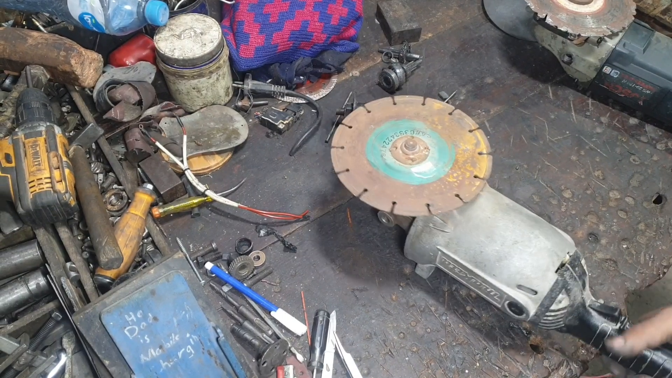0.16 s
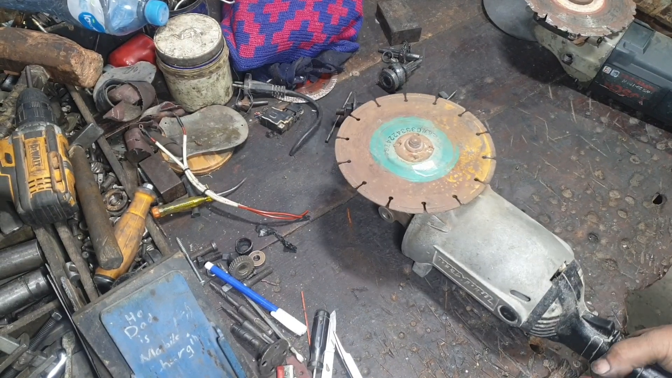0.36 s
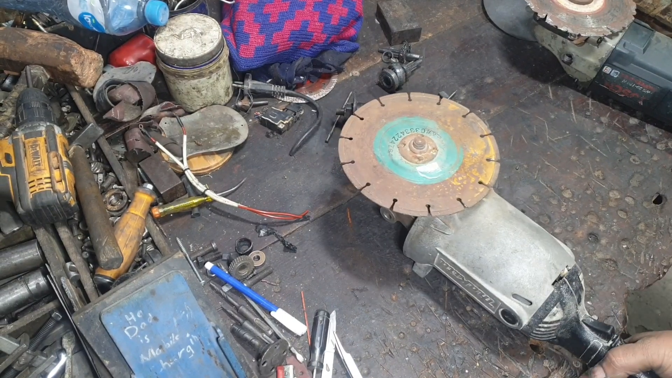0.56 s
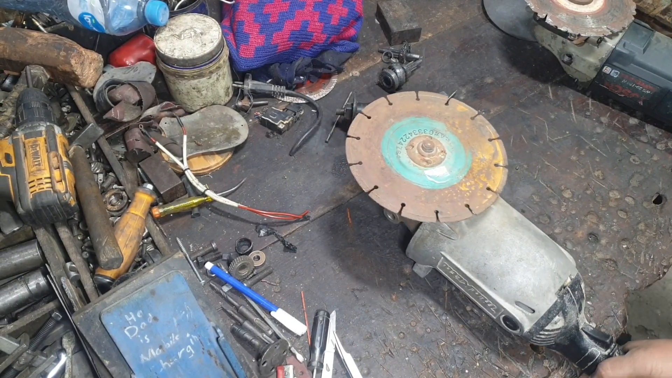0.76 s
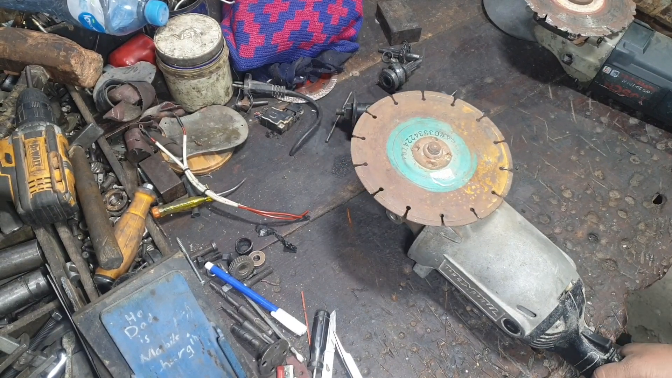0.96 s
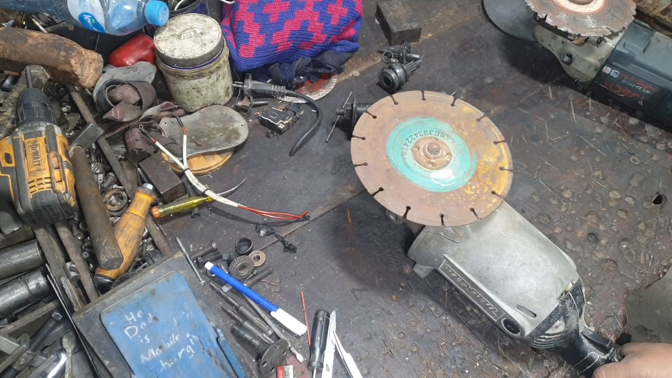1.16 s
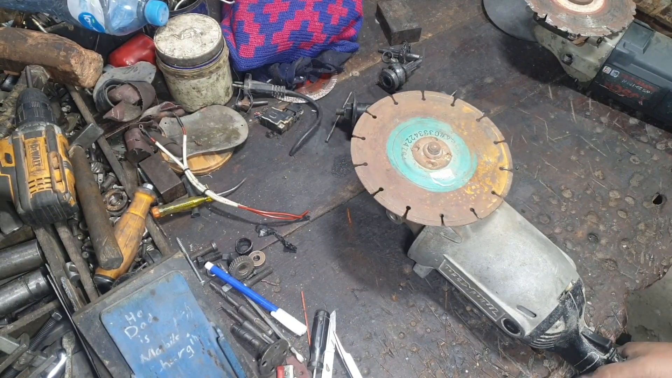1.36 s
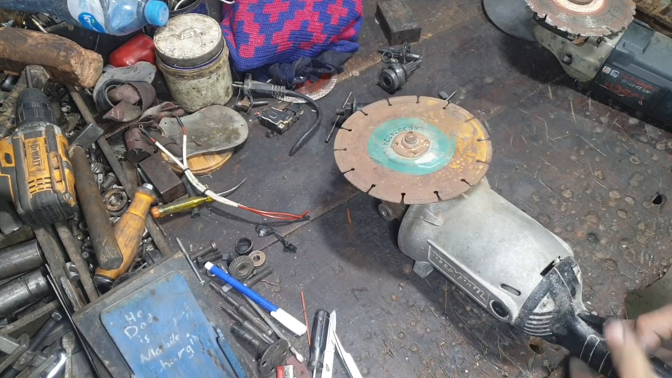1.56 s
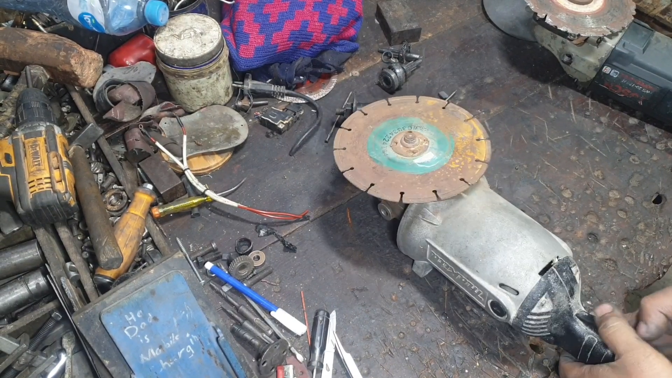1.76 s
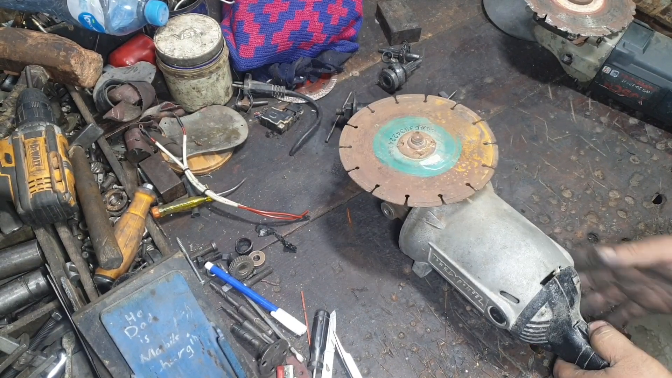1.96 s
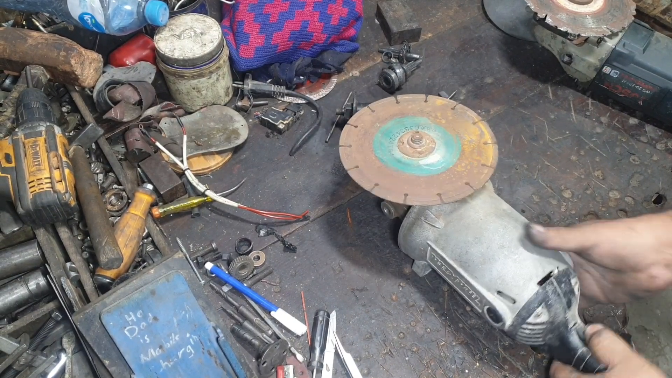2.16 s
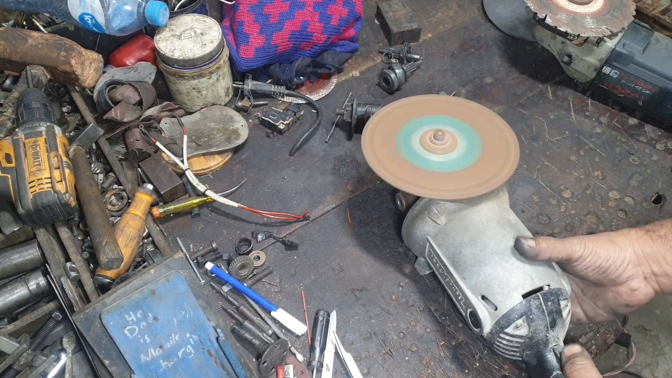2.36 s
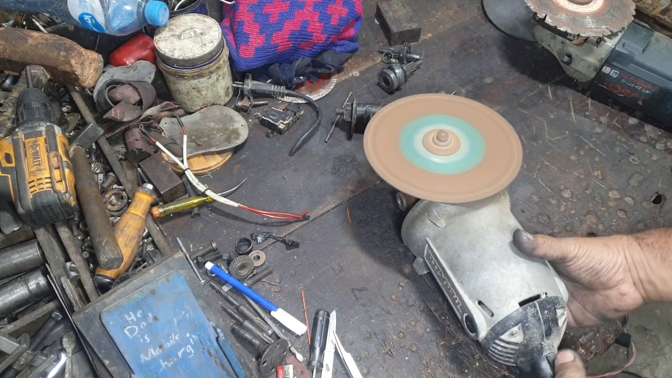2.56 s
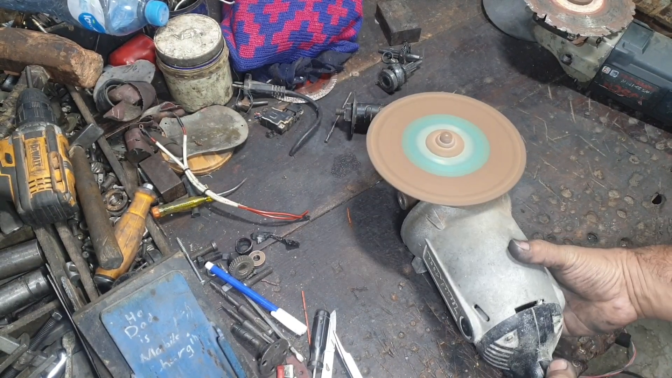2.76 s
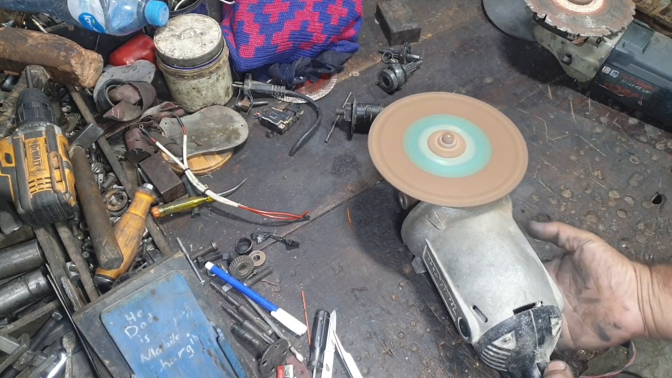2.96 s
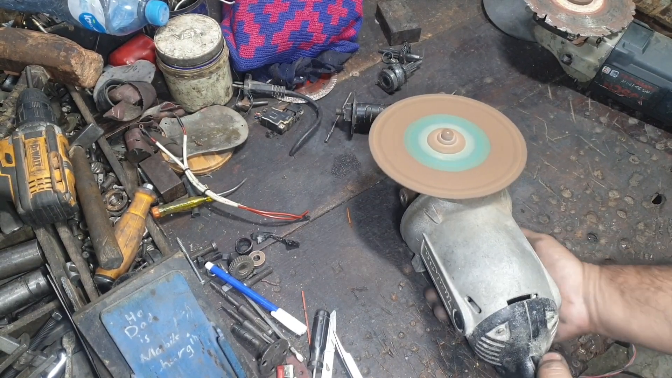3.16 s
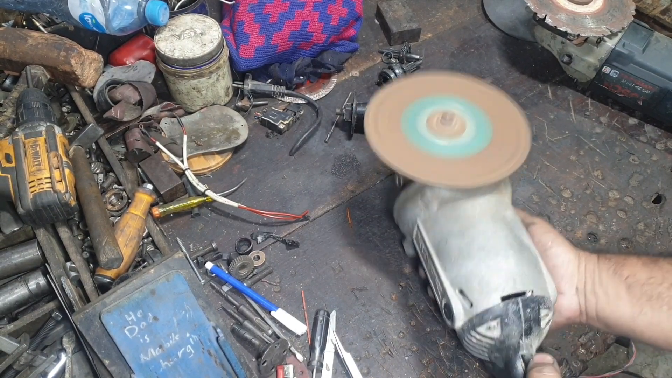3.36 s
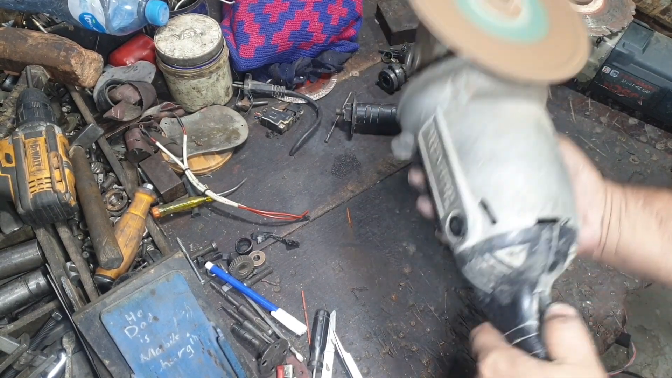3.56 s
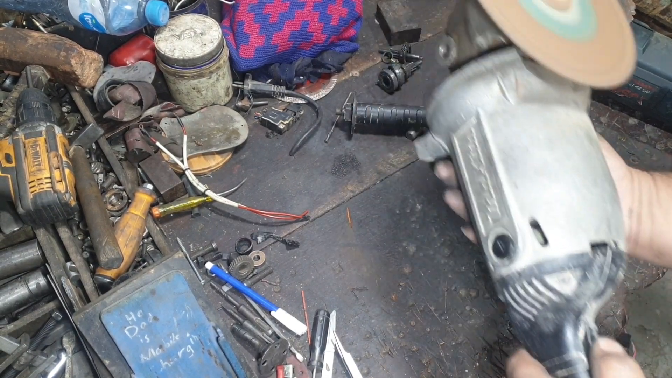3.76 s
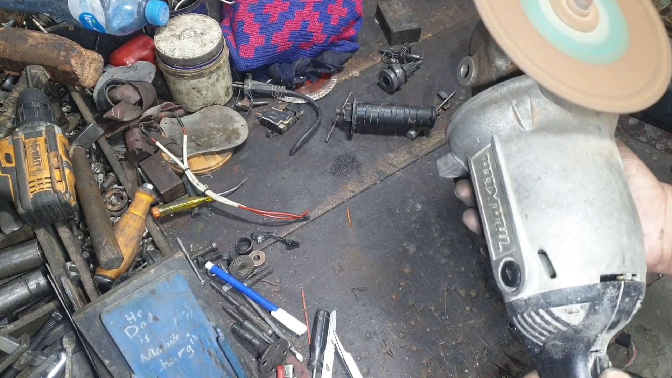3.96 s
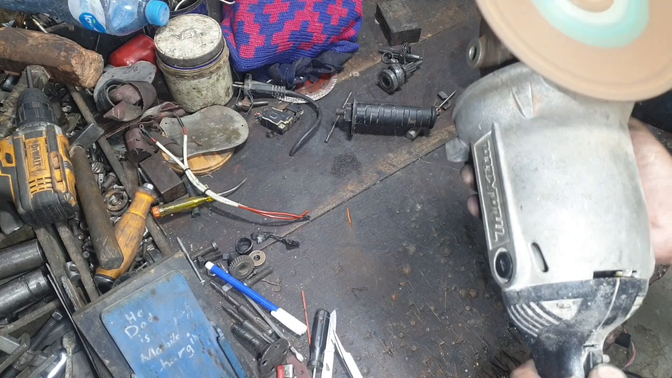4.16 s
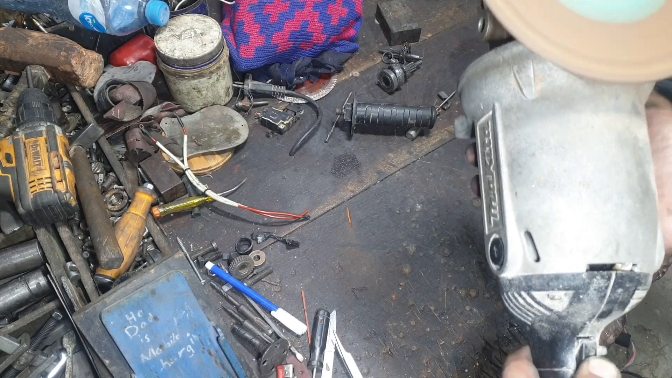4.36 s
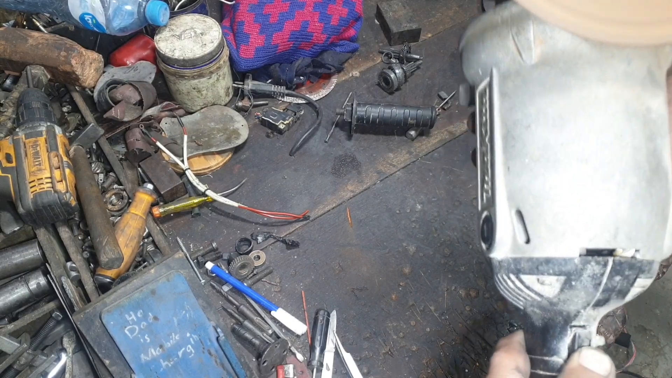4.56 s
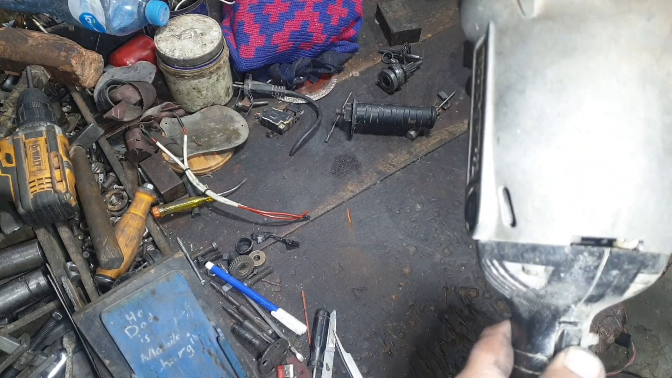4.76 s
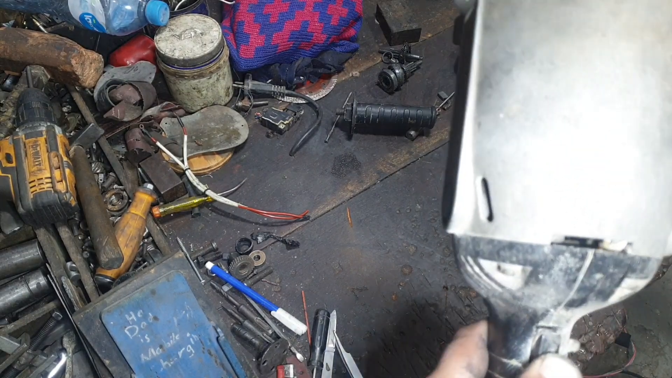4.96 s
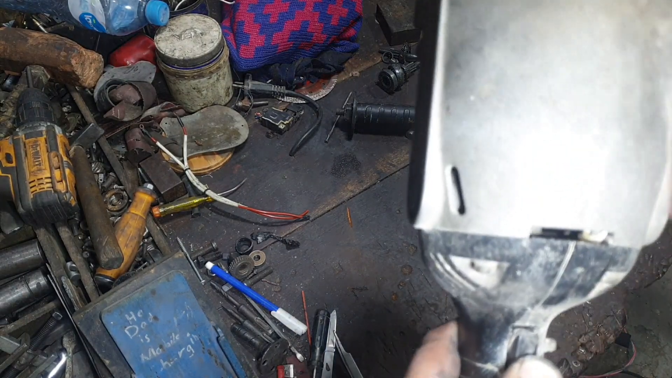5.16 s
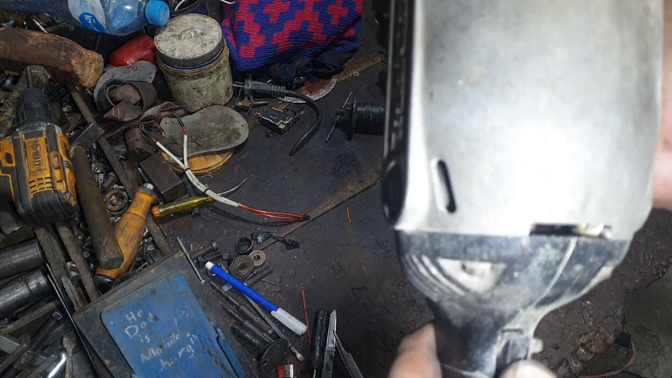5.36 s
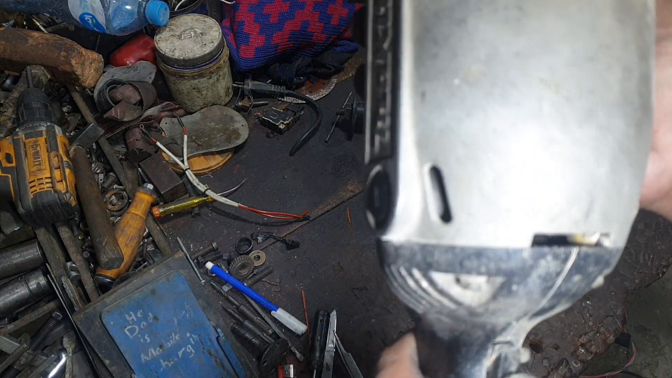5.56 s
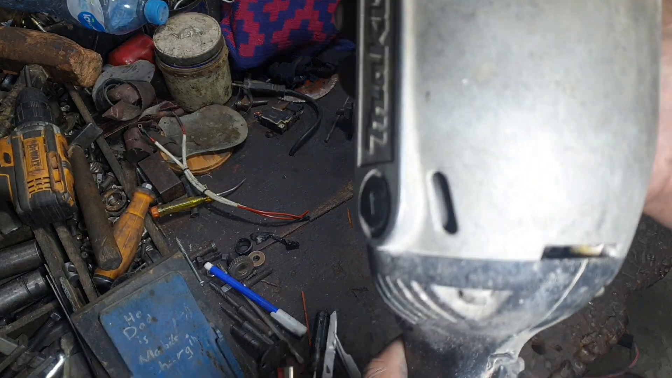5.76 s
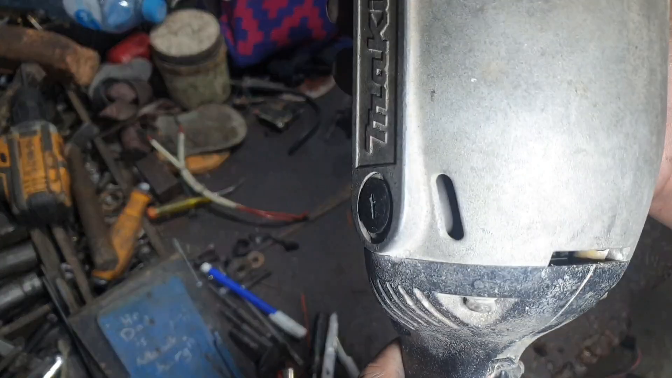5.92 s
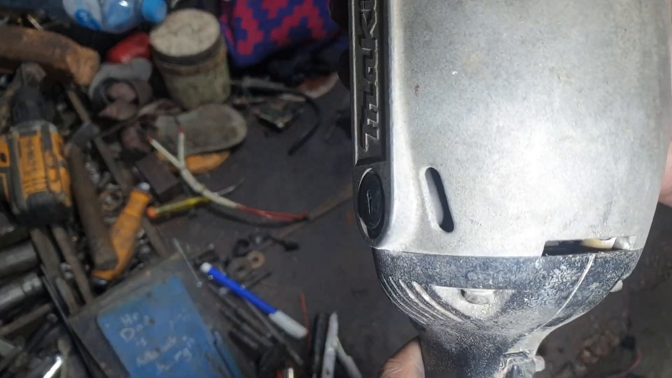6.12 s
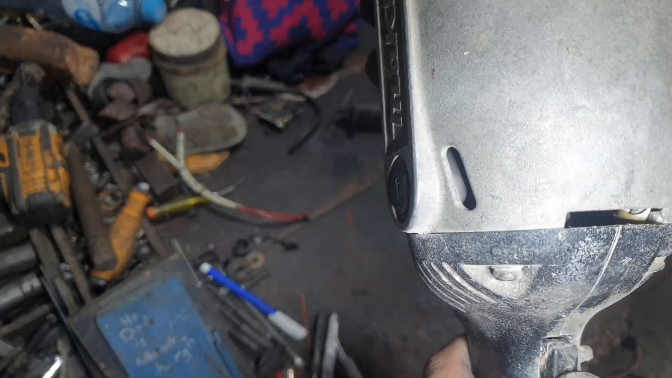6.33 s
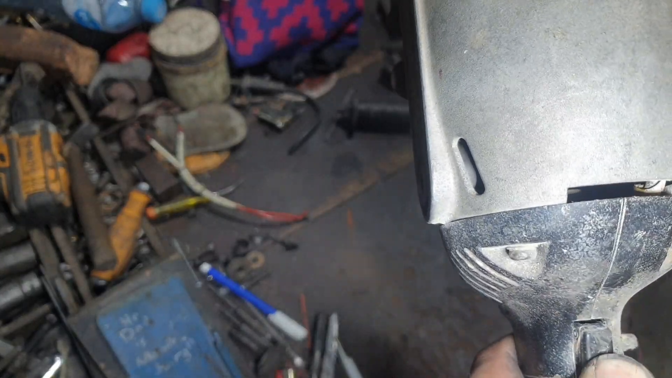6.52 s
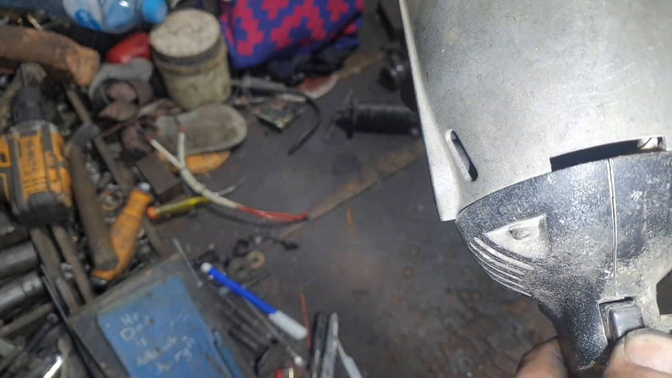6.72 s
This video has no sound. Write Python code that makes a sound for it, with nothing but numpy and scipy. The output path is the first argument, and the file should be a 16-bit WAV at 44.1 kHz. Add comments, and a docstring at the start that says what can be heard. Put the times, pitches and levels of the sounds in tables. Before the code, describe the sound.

Close stereo capture over a steel bench: near-quiet background hum, a soft knock, then the heavy tool body scraping. A loud thump starts the grinder, its gears chattering and bench booming. Sharp clicks mark power-off; it sizzles while coasting and leaves the bench. Two clicks later it drives back up, and broad fan air increasingly masks the gear noise as it comes closer.

```python
"""In a workshop, an angle grinder with a bare diamond blade is slid over a steel bench and switched on.
It kicks and rattles, leaves the bench while coasting for a second, then runs up again near the microphone.
Shaped noise and hails of tiny impacts make the scrape, the chatter of gears and brushes, and the fan's rush.
Tones that follow the computed motor speed make hum and whine; resonances make bench and housing ring."""
import sys
import numpy as np
from scipy import signal
from scipy.fft import rfft, irfft
from scipy.io import wavfile
from scipy.ndimage import uniform_filter1d

SR = 44100
rng = np.random.default_rng(int(sys.argv[2]) if len(sys.argv) > 2 else 0)


def wav_out(sig):
    """Save sig, one row per channel (or a flat mono array), as 16-bit PCM at SR to the path in sys.argv[1]."""
    wavfile.write(sys.argv[1], SR, np.round(np.clip(np.atleast_2d(sig).T, -1, 1) * 32767).astype(np.int16))


N = 303849
T = np.arange(N) / SR

# workshop rumble, level of its stronger band: t/s, level/dB
RUMBLE_LEVEL = [(0, -41.5), (1.3, -46), (2.3, -48.5), (3.6, -55), (4.3, -48), (6.89, -51.5)]
# low hums that come and go: t/s, length/s, start f/Hz, end f/Hz, level/dB
WORKSHOP_HUMS = [(0, .68, 121.2, 114, -42), (0.768, 0.31, 132.7, 135, -43), (1.403, 0.82, 133.4, 139, -45)]
# colour of the faint workshop air: f/Hz, left relative level/dB, right relative level/dB
ROOM_COLOUR = [(25.0, -37, -22), (60.0, -34, -16), (115.0, -23, -6.5), (202, -17, -10.5), (402, -27, -17),
               (700.0, -30, -24), (1300.0, -33, -26), (3500.0, -44.5, -36), (5700, -50.0, -35),
               (7000.0, -54, -48.5), (8500.0, -50.5, -70), (10900, -50, -58), (15000.0, -62, -68)]
# colour of the body scraping on the bench: f/Hz, left relative level/dB, right relative level/dB
SCRAPE_COLOUR = [(30.0, -25, -16), (80.0, 0, 4.5), (140.0, -13, -4.5), (300.0, -20, -13.5),
                 (700.0, -28, -22.5), (1300.0, -29.5, -21.5), (3500.0, -33, -24), (5640, -44.1, -25),
                 (7200.0, -48.0, -41), (8600.0, -41, -55.3), (10900, -43.5, -45), (15000.0, -49, -48)]
# colour of the clicks: f/Hz, left relative level/dB, right relative level/dB
CLICK_COLOUR = [(300, -30, -32), (2000, -7, -37), (4120, -6, 13), (6140, -12, -1), (8740, -27, -12),
                (12700, 1, -12), (15000, -32, -12)]
# clicks of grit catching under the sliding body, of the switch, and of gear teeth clashing: t/s, level/dB, time
# to fall 60 dB/s
CLICK_TIMES = [(0.988, -51, .08), (1.8, -42, .03), (1.823, -47, .05), (2.029, -49, 0.074),
               (2.285, -33, 0.048), (2.304, -26, 0.021), (2.841, -14.5, 0.048), (2.885, -13.5, 0.05),
               (2.918, -15, .05), (2.94, -23, .04), (3.189, -27, 0.027), (3.948, -22, 0.064),
               (4.093, -22, .06)]
# knocks of the body on the bench: t/s, level/dB, time to fall 60 dB/s, low-pass f/Hz
BENCH_KNOCKS = [(0.987, -25.5, 0.078, 219), (.99, -38, 0.081, 800), (1.014, -41, 0.14, 400),
                (2.305, -10.5, 0.051, 4970)]
# a small steel part jingles: f/Hz, width/Hz, relative level/dB
JINGLE_MODES = [(5900, 230, -2), (9460, 160, 2), (14700, 150, -4)]
# colour of contact with the bench: f/Hz, left relative level/dB, right relative level/dB
BENCH_COLOUR = [(39.8, -21, -12), (169, -6, 4), (337, -1, 3.5), (610, -7.5, 0), (1000.0, -9, -6.5),
                (1480, -3.5, 0), (2720, -20, -10.5), (5000, -26, -6), (7100, -21, -16),
                (8600.0, -22.5, -45), (12600, -16.5, -17), (15000.0, -22, -31)]
# resonances of bench top and loose tools: f/Hz, width/Hz, relative level/dB
BENCH_TOP_MODES = [(192, 34, 0.5), (270, 60, 4), (473, 55, 3.5), (710, 49, 0)]
# low gearbox resonances: f/Hz, width/Hz, relative level/dB
LOW_GEARBOX_MODES = [(1326, 52, 2), (1413, 59, -1)]
# high gearbox resonances: f/Hz, width/Hz, relative level/dB
HIGH_GEARBOX_MODES = [(3410, 49, -3), (3640, 110, 5), (4400, 61, -10), (6000, 44, -21.5)]
# housing resonances that fan and gear tones sweep through: f/Hz, width/Hz, level/dB
HOUSING_MODES = [(2410, 210, -29.5), (2962, 166, -29.5), (3575, 280, -24.5)]
# colour of the fan's air: f/Hz, left relative level/dB, right relative level/dB
AIR_COLOUR = [(50.0, -24, -27), (130.0, -50, -23), (203, -19.5, -13), (387, -15, -4.5), (660, -14.5, -13),
              (830, -5.5, -3.5), (1390, -7.5, -1.5), (2350, -6, -1), (3100, -13, -5.5), (5000, -13.5, -2),
              (6270, -12.5, -2), (7070, -12.5, -9), (8500, -8.5, -21.5), (12500.0, -16, -16.5),
              (15100, -21.5, -31.5)]
# colour of the gears: f/Hz, left relative level/dB, right relative level/dB
GEAR_COLOUR = [(50.0, -23, -8), (180.0, -15, -15.5), (298, -14, -9.5), (550, -13.5, 0), (763, -5, 4.5),
               (1100, -16, -15.5), (1360, -3, 0.5), (2480, -7, -0.5), (3500, -9.5, 0.6), (5640, -11, 5.5),
               (7280, -12.5, -14), (8160, -16, -28), (11300, -11, -12.5), (12900, -7, -12),
               (13900, -9.5, -12.5)]
# how the grinder is held: t/s, closeness/0-1, running noise at FREE_HZ level/dB
GRINDER_POSE = [(2.3, 0.4, -16.5), (3.2, 0.18, -17), (3.5, 0.22, -16.5), (3.9, 0.29, -14.5),
                (4.15, .28, -15), (4.6, 0.45, -17.5), (5.1, 0.71, -17), (6.23, 0.76, -17),
                (6.89, 0.75, -19)]
# power off, the blade coasts: start t/s, end t/s
COAST_TIMES = (2.832, 3.926)

ROOM_DB = -50
SWITCH_ON_S = 2.303
# armature: free turns a second and their creep as the grease warms, torque fall-off, drag time constant
FREE_HZ, CREEP_HZ_PER_S, TORQUE_FALL_HZ, DRAG_S = 328.52, 1.473, 83.77, 3.616
# blade turns, fan notes and gear notes per armature turn
SPINDLE_RATIO, FAN_BLADES, GEAR_ORDER = .395, 12, 15
LIFT_S, LIFT_TAKES_S = 3.36, 0.053
# the body is dragged from SLIDE_S until the switch is pressed
SLIDE_S, SLIDE_DB, GRIT_DB, GRIT_HOLD_S = 1.65, -36.5, -53, 0.18
# lowest mode of the bench top, and the starting jolt that swings it
BENCH_HZ, BENCH_WIDTH_HZ = 94.9, 3.9
JOLT_ATTACK_S, JOLT_HOLD_S, JOLT_T60_S = 0.034, 0.082, 0.52
# vent whistle: pitch at rest, rise per turn a second, best speed, width of that range, level
VENT_HZ, VENT_RISE, VENT_BEST_HZ, VENT_RANGE_HZ, VENT_DB = 3000, 9.3, 290, 85, -24.5
# unbalance hum at FREE_HZ in the air, and the body resonance that the blade hum passes
HUM_DB, BODY_HZ, BODY_WIDTH_HZ, BODY_DB = -45, 342, 26, -37
# the fan's air passage resonates just above its full-speed note
DUCT_HZ, DUCT_WIDTH_HZ, DUCT_DB = 4038, 165, -21
RUN_DB_PER_HZ, SLACK_DB = 0.07, 0.26  # louder with speed, and while the teeth run slack
TOP_HZ = 15500  # top of what the microphone passes


def undb(db):
    """Turn decibels into gain."""
    return 10 ** (np.asarray(db) / 20)


def curves(table):
    """Join the points of each table column by straight lines in time."""
    s, *columns = np.transpose(table)
    return [np.interp(T, s, column) for column in columns]


def unit(x):
    """Scale so that the mean of the channels has rms 1."""
    return x / np.std(np.atleast_2d(x).mean(axis=0))


def pan(db):
    """Channel gains for a left-minus-right level, with mean 1."""
    gains = undb(np.array([[db], [-db]]) / 2)
    return gains / gains.mean()


def gate(start, stop):
    """Open between two times, with 2 ms edges."""
    return np.clip(np.minimum(T - start, stop - T) / .002, 0, 1)


def walk(rate):
    """Smooth chance with spread 1 that changes about rate times a second."""
    k = max(int(SR / rate), 1)
    smooth = uniform_filter1d(rng.standard_normal(N), k, mode="wrap")
    return unit(uniform_filter1d(smooth, k, mode="wrap"))


def cut(x, hz, kind, order=2):
    """Low-pass or high-pass filter."""
    return signal.sosfilt(signal.butter(order, min(hz, .45 * SR), kind, fs=SR, output="sos"), x)


def ring(x, hz, width):
    """One resonance: the nearer a sound is to its pitch, the more of it passes."""
    return signal.lfilter(*signal.iirpeak(hz, hz / width, fs=SR), x)


def modes(x, table):
    """A set of steep resonances, rms 1."""
    total = 0
    for hz, width, db in table:
        total = total + undb(db) * unit(ring(ring(x, hz, 0.75 * width), hz, 4 * width))
    return unit(total)


def response(hz, centre, width):
    """Gain of a steep resonance for a tone that sweeps through it."""
    return 1 / (1 + (2 * (hz - centre) / width) ** 2)


def colour(x, table):
    """Filter each channel to a table of levels, without sound before its cause."""
    hz, *sides = np.transpose(table)
    size = 4096
    log_hz = np.log(np.maximum(np.fft.rfftfreq(size, 1 / SR), 1))
    levels = [np.interp(log_hz, np.log(hz), db) for db in sides]
    # folding the cepstrum forward in time makes the filter minimum-phase
    cepstrum = irfft(np.log(undb(levels)))
    cepstrum[:, 1:size // 2] *= 2
    cepstrum[:, size // 2 + 1:] = 0
    kernel = irfft(np.exp(rfft(cepstrum)))
    return signal.fftconvolve(x, kernel, axes=1)[:, :N]


def noise(apart_hz=1550, stray=0.28):
    """Noise at two close microphones: nearly alike in the bass, much less alike in the treble."""
    mid, side, low_side = rng.standard_normal((3, N))
    side = cut(side, apart_hz, "high", order=4) + stray * cut(low_side, apart_hz, "low", order=4)
    return mid + side * np.array([[1], [-1]])


def impacts(rate, scatter_db, t60):
    """Strength of a hail of tiny impacts of uneven size, rms 1; rate is hits a second."""
    hits = (rng.random(N) < rate / SR) * undb(scatter_db * rng.standard_normal(N)) ** 2
    energy = signal.lfilter([1], [1, -undb(-120 / (t60 * SR))], hits)
    return np.sqrt(energy / energy.mean())


def blow(s, db, t60):
    """Loudness curve of one blow: sudden, then falling 60 dB in t60 seconds."""
    return undb(db - 60 * np.maximum(T - s, 0) / t60) * gate(s - .001, np.inf)


def swell(s, attack, hold, t60):
    """Loudness curve that rises, holds until hold seconds after its start and dies away."""
    return np.clip((T - s) / attack, 0, 1) * undb(-60 * np.maximum(T - s - hold, 0) / t60)


def clutter(x, echo_db, t60):
    """Bench top and tools scatter a short dense echo, which ripples the spectrum."""
    t = T[:SR // 10]
    echo = cut(noise()[:, :len(t)], 700, "high") * undb(-60 * t / t60) * (t > .002)
    echo *= undb(echo_db) / np.sqrt(np.sum(echo ** 2, axis=1, keepdims=True))
    return unit(x + signal.fftconvolve(x, echo, axes=1)[:, :N])


def workshop(fade_s=0.074):
    """Background: resonant noise rumbles, sine tones hum and waver, filtered noise gives faint air."""
    murk = unit(ring(ring(noise(), 122.3, 25), 102, 52)) * pan(-5.0)
    rumble = unit(ring(ring(noise(), 79, 40), 74, 65)) * undb(-4) * pan(-4.0)
    air = unit(cut(colour(noise(), ROOM_COLOUR), 168, "high", order=4))
    air = air * undb(ROOM_DB + .5 * walk(6))
    hum = 0
    for s, length, start_hz, end_hz, db in WORKSHOP_HUMS:
        hz = np.interp(T, [s, s + length], [start_hz, end_hz])
        fade = np.clip(np.minimum(T - s, s + length - T) / fade_s + .5, 0, 1)
        tone = np.sqrt(2) * np.sin(2 * np.pi * np.cumsum(hz) / SR)
        hum = hum + tone * fade * undb(db)
    hum = hum * undb(1.1 * walk(12)) * pan(-3.0)
    return (murk + rumble) * undb(curves(RUMBLE_LEVEL)[0]) + hum + air


def handling(breakaway_db=-39, fine_grit_db=-61, rustle_db=-62):
    """The body knocks on the bench, breaks free and scrapes over grit; switch and gear teeth click."""
    drag = colour(noise() * impacts(rate=2300, scatter_db=-1.0, t60=0.0076), SCRAPE_COLOUR)
    breakaway = undb(breakaway_db) * swell(SLIDE_S, .012, hold=0.011, t60=0.14)
    rumble = unit(cut(drag, 1740, "low")) * (undb(SLIDE_DB) + breakaway)
    grit_burst = undb(GRIT_DB) * swell(SLIDE_S, 0.0047, GRIT_HOLD_S, t60=0.27)
    grit = unit(cut(drag, 4200, "high", order=3)) * (undb(fine_grit_db) + grit_burst)
    rustle = unit(ring(ring(drag, 3800, 2500), 3800, 2500))
    rustle = rustle * undb(rustle_db) * swell(0.41, 0.027, hold=0.12, t60=.2)
    clicks = unit(colour(noise(), CLICK_COLOUR)) * sum(blow(*row) for row in CLICK_TIMES)
    knocks = 0
    for s, db, t60, hz in BENCH_KNOCKS:
        knocks = knocks + unit(cut(colour(noise(), BENCH_COLOUR), hz, "low")) * blow(s, db, t60)
    jingle = modes(noise(), JINGLE_MODES) * blow(0.98, db=-51, t60=0.15) * pan(3)
    return (rumble + grit) * gate(SLIDE_S, SWITCH_ON_S) + rustle + clicks + knocks + jingle


def on_bench():
    """1 while the body lies on the bench, 0 once it is in the air."""
    return np.clip(1 - (T - LIFT_S) / LIFT_TAKES_S, 0, 1)


def bench(turn, jolt_db=-16.0, drone_db=-27, rattle_db=-19.5, tools_db=-31, shake_db=-41, idle_db=-48,
          taps_db=-41):
    """The jolt and the blade's unbalance swing the bench top; the body rattles and taps on it."""
    swing = 2 * np.pi * BENCH_HZ * (T - SWITCH_ON_S)
    spindle = SPINDLE_RATIO * turn
    jolt = np.sin(swing) * swell(SWITCH_ON_S, JOLT_ATTACK_S, JOLT_HOLD_S, JOLT_T60_S) * undb(jolt_db)
    # unbalance drives the bench hardest when the blade speed is near its resonance
    drone = ring(np.sin(spindle) * on_bench(), BENCH_HZ, BENCH_WIDTH_HZ)
    shake = np.abs(signal.hilbert(drone))
    # contact noise grows and shrinks with each swing
    contact = noise() * np.exp(0.68 * np.sin(swing)) * impacts(rate=1900, scatter_db=4.0, t60=0.015)
    rattle = clutter(colour(contact, BENCH_COLOUR), echo_db=-2.5, t60=0.082)
    rattle = rattle * undb(rattle_db) * swell(SWITCH_ON_S, 0.0018, hold=0.11, t60=0.95)
    tools = undb(tools_db) * swell(SWITCH_ON_S, 0.099, hold=0.18, t60=0.63)
    tools = tools + undb(shake_db) * shake + undb(idle_db)
    # one tap in each turn of the blade
    taps = np.exp(30 * (np.cos(spindle + 0.16 * walk(60)) - 1)) * undb(5.4 * walk(85))
    taps = unit(cut(taps, 290, "high")) * undb(taps_db)
    boom = (modes(contact, BENCH_TOP_MODES) * tools + taps) * pan(-5.0)
    swinging = np.sqrt(2) * (jolt + drone * undb(drone_db)) * pan(-5.0)
    return (rattle + boom) * on_bench() + swinging


def motor():
    """Speed, and torque in dB over free running: torque falls as speed grows, and drag slows it."""
    step = .001
    times = np.arange(SWITCH_ON_S, T[-1], step)
    hz, rows = 0, []
    for s in times:
        free = FREE_HZ + CREEP_HZ_PER_S * (s - SWITCH_ON_S)
        coasting = COAST_TIMES[0] < s < COAST_TIMES[1]
        torque = 0 if coasting else np.exp((free - hz) / TORQUE_FALL_HZ)
        hz += step * (torque * free - hz) / DRAG_S
        rows.append((s, hz, 20 * np.log10(max(torque, 1))))
    return curves(rows)


def mains_throb(depth):
    """Torque peaks twice in each mains cycle."""
    return 1 + np.clip(depth, 0, 1) * np.sin(2 * np.pi * 100 * T)


def gearbox(speed, torque_db, low_db=-40, high_db=-44, most_db=22, bench_db=-9, backlash_db=4,
            crossing_db=-36, crossing_width_hz=170, sing_db=-2):
    """Loaded teeth make the housing sing in its lowest mode; slack teeth and passing tones ring high ones."""
    load_db = np.minimum(torque_db, most_db)
    low = undb(low_db + 1.05 * load_db + bench_db * on_bench())
    strongest_hz = max(HIGH_GEARBOX_MODES, key=lambda mode: mode[2])[0]
    crossing = sum(response(order * speed, strongest_hz, crossing_width_hz)
                   for order in (FAN_BLADES, GEAR_ORDER))
    high = undb(high_db + 1.02 * load_db + backlash_db * gate(*COAST_TIMES))
    high = high + undb(crossing_db) * crossing
    strikes = noise() * impacts(rate=700, scatter_db=-0.5, t60=0.0082) * mains_throb(0.71)
    sing_hz = LOW_GEARBOX_MODES[0][0] + 14 * walk(36.2)
    sing = np.sqrt(2) * np.sin(2 * np.pi * np.cumsum(sing_hz) / SR) * undb(sing_db)
    sing = sing * np.clip(load_db / 10, 0, 1)
    low_ring = (modes(strikes, LOW_GEARBOX_MODES) + sing) * low * pan(-20.0)
    return low_ring + modes(strikes, HIGH_GEARBOX_MODES) * high * pan(-8.5)


def vent(speed, bench_db=-3):
    """A broad whistle of air that rises with fan speed and speaks best a little below full speed."""
    hz = VENT_HZ + VENT_RISE * speed
    gain = undb(VENT_DB + bench_db * on_bench()) * response(speed, VENT_BEST_HZ, VENT_RANGE_HZ)
    # slow complex noise spreads the whistle around its pitch
    eddies = rng.standard_normal((2, N)) + 1j * rng.standard_normal((2, N))
    eddies = cut(eddies, 490, "low")
    whistle = np.real(eddies * np.exp(2j * np.pi * np.cumsum(hz) / SR))
    return unit(whistle) * gain * pan(-19)


def housing(hz):
    """Gain that the housing's resonances give to a tone."""
    return sum(undb(db) * response(hz, centre, width) for centre, width, db in HOUSING_MODES)


def whine(speed, turn, torque_db, gear_db=-8, coast_gear_db=6, bench_db=9, bench_fan_db=3,
          load_damping=0.55, flutter_db=2.33, wobble=0.025):
    """Fan and gear tones swell at housing resonances; unbalance hums; all waver in the turbulent air."""
    fan_hz = FAN_BLADES * speed
    fan = housing(fan_hz) + undb(DUCT_DB) * response(fan_hz, DUCT_HZ, DUCT_WIDTH_HZ)
    fan = fan * undb(bench_fan_db * on_bench())  # the bench top, shaken by it, radiates it too
    gear = housing(GEAR_ORDER * speed) * undb(gear_db + coast_gear_db * gate(*COAST_TIMES))
    damped = undb(-load_damping * torque_db)
    hum = undb(HUM_DB + bench_db * on_bench()) * (speed / FREE_HZ) ** 2.9
    blade_order = 3 * SPINDLE_RATIO
    blade = undb(BODY_DB) * response(blade_order * speed, BODY_HZ, BODY_WIDTH_HZ)
    blade = blade + hum * undb(-9) * on_bench()
    # multiple of the armature speed, gain
    lines = [(FAN_BLADES, fan * damped), (GEAR_ORDER, gear * damped), (1, hum), (3, hum), (blade_order, blade)]
    shaft = turn + wobble * walk(30)
    out = 0
    for multiple, gain in lines:
        tone = gain * undb(flutter_db * walk(19)) * np.sin(multiple * shaft)
        # each channel wavers on its own
        out = out + np.sqrt(2) * tone * (1 + 0.16 * np.array([walk(70), walk(78)]))
    return out * pan(-12.0)


def running(speed, turn):
    """Impact noise of gears and brushes chatters; the fan's air masks it more as the vents come close."""
    close, db = curves(GRINDER_POSE)
    close = np.clip(close, 0, 1)
    teeth = noise() * impacts(rate=3000, scatter_db=2.0, t60=0.012) * (1 + 0.04 * np.sin(turn))
    gears = clutter(colour(teeth, GEAR_COLOUR), echo_db=-3, t60=0.029)
    # unloaded teeth sizzle in their backlash while the blade coasts
    sizzle = unit(ring(ring(teeth, 13100, 2400), 12600, 3200))
    gears = gears + sizzle * gate(*COAST_TIMES) * undb(-16.5) * pan(3)
    rush = noise(apart_hz=1620) * impacts(rate=7000, scatter_db=1.0, t60=0.0044)
    air = clutter(colour(rush, AIR_COLOUR), echo_db=-12, t60=.06)
    mix = np.sqrt(1 - close) * gears + np.sqrt(close) * air
    level_db = db + RUN_DB_PER_HZ * (speed - FREE_HZ) + SLACK_DB * gate(*COAST_TIMES)
    return mix * undb(level_db) * mains_throb(0.013)


def scene():
    """The workshop, the handling, and the grinder whose sounds follow one motor speed."""
    speed, torque_db = motor()
    turn = 2 * np.pi * np.cumsum(speed) / SR
    grinder = bench(turn) + gearbox(speed, torque_db) + vent(speed)
    grinder = grinder + whine(speed, turn, torque_db) + running(speed, turn)
    return workshop() + handling() + grinder * gate(SWITCH_ON_S, np.inf)


def record(dry):
    """The left port hears slightly later; the microphone drops deep bass, clips at full scale, cuts the top."""
    lag = 4  # samples
    ports = np.array([np.pad(dry[0], (lag, 0))[:N], dry[1]])
    clipped = np.clip(cut(ports, 52, "high"), -1, 1)
    return signal.sosfilt(signal.ellip(10, .2, 80, TOP_HZ, fs=SR, output="sos"), clipped)


dry = scene()
out = record(dry)
wav_out(out)
```